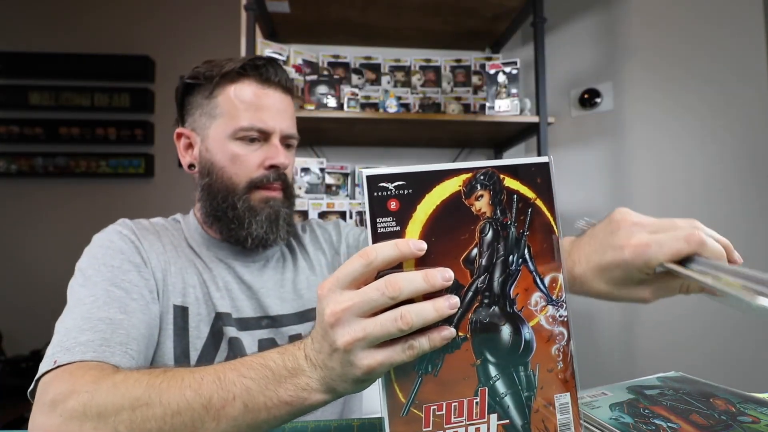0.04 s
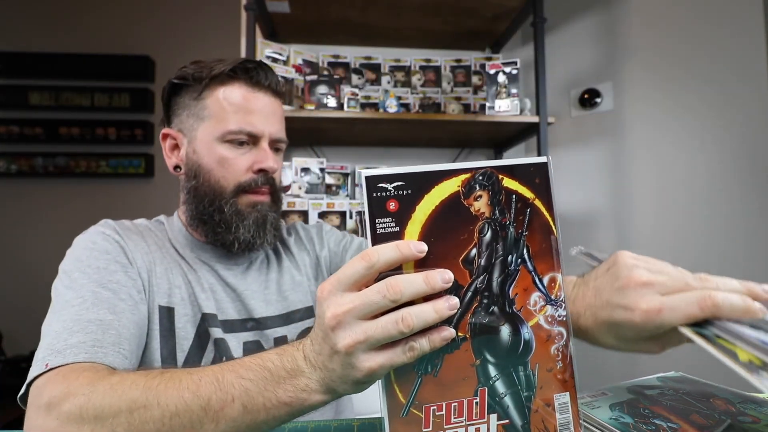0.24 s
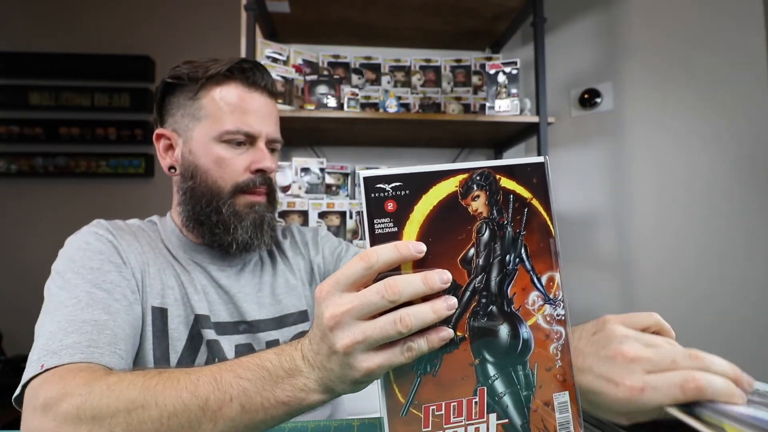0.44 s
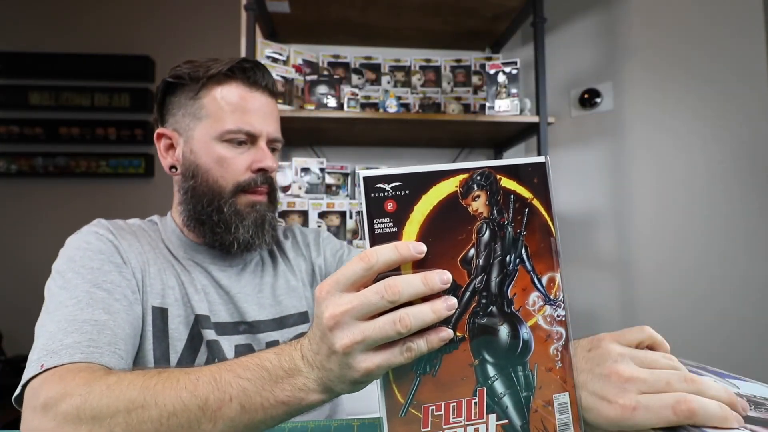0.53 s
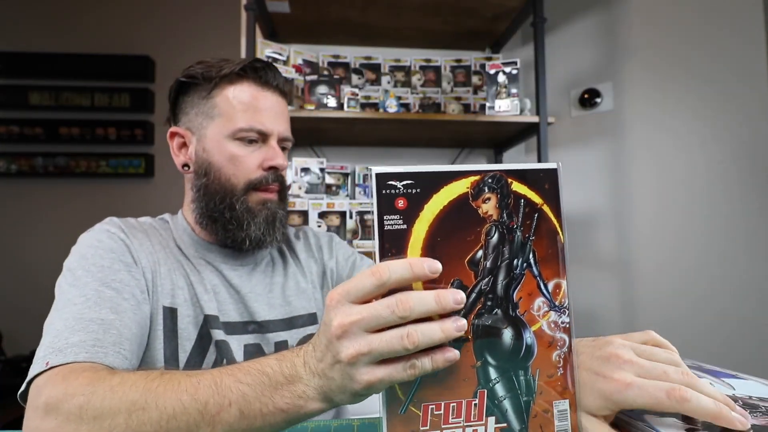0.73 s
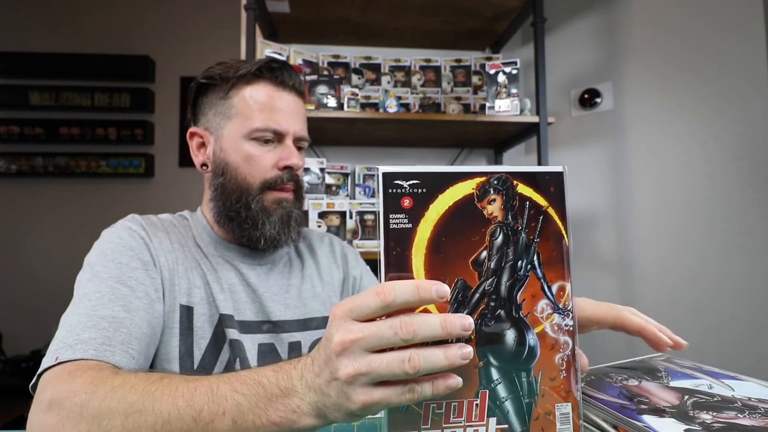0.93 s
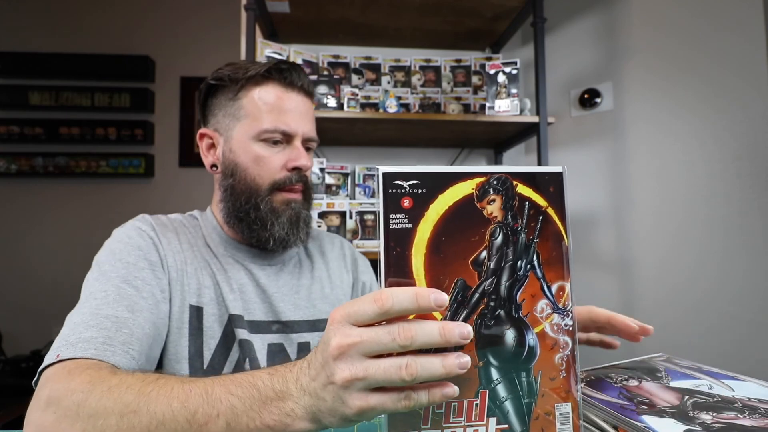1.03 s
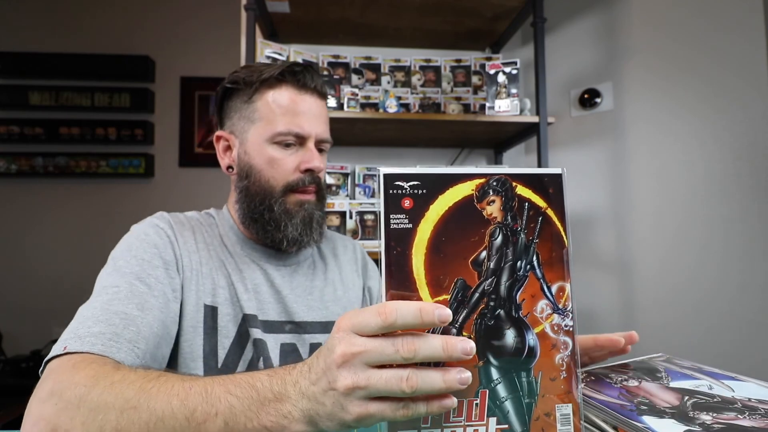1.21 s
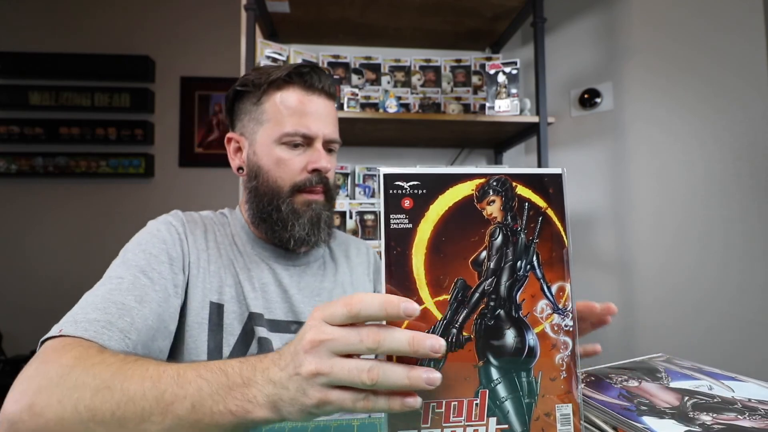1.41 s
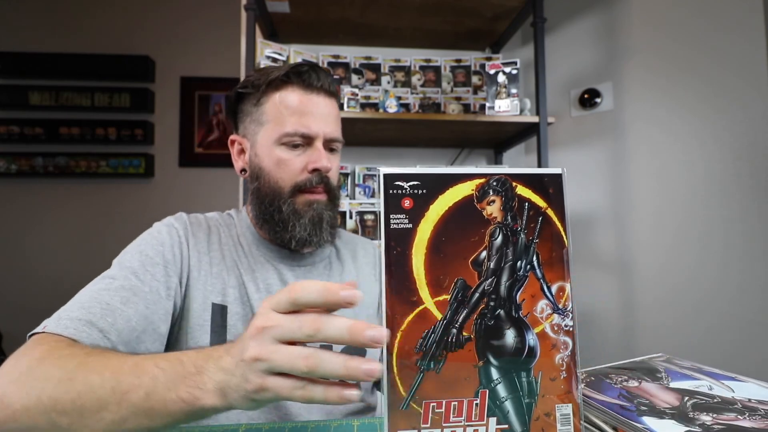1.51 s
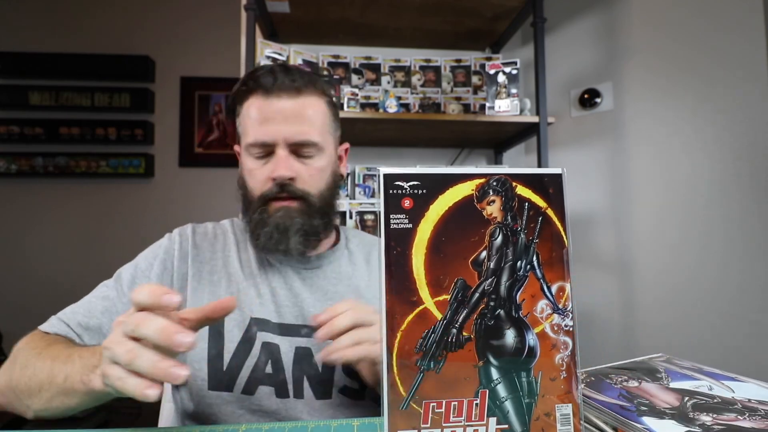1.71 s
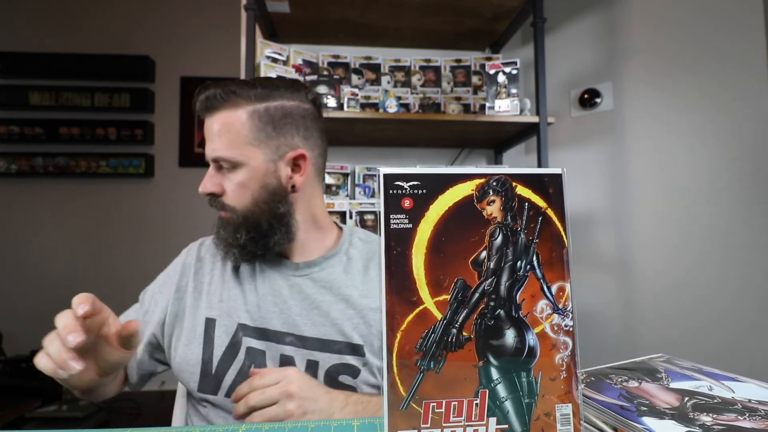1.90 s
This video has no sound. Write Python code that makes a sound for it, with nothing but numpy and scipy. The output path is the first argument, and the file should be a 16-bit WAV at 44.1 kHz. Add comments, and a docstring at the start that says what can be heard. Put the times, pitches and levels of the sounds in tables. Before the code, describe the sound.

Crinkling plastic as a sleeved comic slides onto a stack and drops with a slap.

```python
"""In a small room with mains hum, a comic in a plastic sleeve is swung over a table, slid onto a pile
of others and let drop. The sleeve crinkles by buckling, the backing board flaps, and sliding friction
hisses. The landing slaps and sets the modes of the pile thudding; the table sways the near microphone.
The hand slips off, the arms rustle faintly and a few tiny ticks follow."""
import sys
import numpy as np
from scipy import signal
from scipy.fft import rfft, irfft, next_fast_len
from scipy.io import wavfile

SR = 44100
rng = np.random.default_rng(int(sys.argv[2]) if len(sys.argv) > 2 else 0)


def wav_record(signal):
    """Record a signal, one row per channel, as 16-bit PCM in the file named by sys.argv[1]."""
    frames = np.transpose(np.atleast_2d(signal))
    bounded = np.clip(frames, -1, 1)
    # unit amplitude maps onto the largest positive 16-bit level
    quanta = np.round(bounded * 32767).astype(np.int16)
    wavfile.write(sys.argv[1], SR, quanta)


N = 85995


def amp(db):
    """Amplitude ratio of a level in decibels."""
    return 10 ** (np.asarray(db) / 20)


def along(points, hz):
    """Interpolation of (Hz, value) points on a logarithmic frequency axis."""
    freqs, values = np.transpose(points)
    return np.interp(np.log(hz + 1e-6), np.log(freqs), values)


def envelope(rows):
    """Gain per sample, linear in decibels between (seconds, dB) rows."""
    return amp(np.interp(np.arange(N) / SR, *np.transpose(rows)))


def filtered(x, response):
    """Linear filtering: the spectrum of x is multiplied by a frequency response."""
    size = next_fast_len(N + SR // 2)
    return irfft(rfft(x, size) * response(np.fft.rfftfreq(size, 1 / SR)), size)[..., :N]


def coloured(x, spectrum):
    """Spectral shaping of x by (Hz, dB) rows, normalised to unit rms."""
    shaped = filtered(x, lambda hz: amp(along(spectrum, hz)))
    return shaped / np.sqrt(np.mean(shaped ** 2) + 1e-20)


def noise(spectrum):
    """Gaussian noise of unit rms with the given spectral shape."""
    return coloured(rng.standard_normal(N), spectrum)


def add(track, start_s, sound):
    """Superposition of a sound on the track."""
    part = track[round(start_s * SR):][:len(sound)]
    part += sound[:len(part)]


def snap(db, t60, colour, ring_hz=1, size=4096):
    """Source and filter: an impulse and a dying train of micro-buckles excite a body's response."""
    drive = 0.72 * rng.standard_normal(size) * amp(-60 * np.arange(size) / SR / t60)
    drive[0] += 2  # the first snap
    gain = amp(along(colour, np.fft.rfftfreq(size, 1 / SR) / ring_hz))
    cepstrum = irfft(np.log(gain))
    cepstrum[1:size // 2] *= 2  # folding gives a causal, minimum-phase response
    cepstrum[size // 2 + 1:] = 0
    sound = irfft(rfft(drive) * np.exp(rfft(cepstrum)))
    span = round(0.003 * SR)  # db is the rms level of the whole energy packed into 3 ms
    return amp(db) * np.sqrt(span) * sound / np.linalg.norm(sound)


def background(room_tone_db=-56.5):
    """Mains harmonics and room tone, with structure-borne sway passed from table to microphone."""
    # Each row: frequency in Hz, level in dB.
    harmonics = [(59.6, -57), (119.6, -69.5), (179.6, -60.5)]
    # Each row: time in seconds, level in dB.
    sway_levels = [(0, -56), (.5, -67.5), (.63, -33), (.71, -35), (.755, -31.5), (.85, -30.5), (.98, -33),
                   (1.15, -46.5), (1.35, -47.5), (1.95, -59)]
    # Each row: frequency in Hz, relative spectral density in dB.
    sway_spectrum = [(3, -22), (11, 0.5), (22, -0.5), (35, -5), (55, -18.5), (80, -31), (200, -48),
                     (600, -79)]
    room_tone_spectrum = [(12, -17), (22, 3), (60, -13.5), (91, -13.5), (190, -10), (300, -16),
                          (500, -19.5), (1030, -24), (3440, -29), (5380, -29.5), (16000, -32)]
    t = np.arange(N) / SR
    hum = sum(amp(db) * np.sqrt(2) * np.sin(2 * np.pi * (hz * t + rng.random())) for hz, db in harmonics)
    sway = envelope(sway_levels) * noise(sway_spectrum)
    return hum + sway + amp(room_tone_db) * noise(room_tone_spectrum)


def microphone_hiss(level_db=-64):
    """Self-noise of the microphone, in antiphase between the two channels."""
    # Each row: frequency in Hz, relative spectral density in dB.
    spectrum = [(30, -18), (150, -2), (500, 1.5), (1500, -4.5), (3500, -7), (7000, 1), (16000, 0.5)]
    hiss = amp(level_db) * noise(spectrum)
    return np.array([hiss, -hiss])


def sleeve_slide(slips_per_s=14000, spread_db=3.5):
    """Stick-slip friction: plastic moves over plastic in dense impulses of uneven size."""
    # Each row: time in seconds, level in dB.
    levels = [(0, -53.5), (.07, -64), (.11, -54), (.21, -56.5), (.245, -46.5), (.28, -49), (.325, -52.5),
              (.37, -45), (.405, -40.5), (.435, -36.5), (.48, -35), (.5, -31), (.545, -36), (.58, -44),
              (.685, -47), (.703, -33.5), (.71, -43.5), (.745, -39.5), (.8, -54.5), (.9, -61), (1, -88)]
    # Each row: frequency in Hz, relative spectral density in dB.
    spectrum = [(80, -24), (280, -10), (460, 0), (620, 3.5), (1100, -0.5), (1900, -4.5), (3600, -5),
                (5500, -8.5), (7500, -20), (12000, -24.5), (16000, -30)]
    sizes = amp(spread_db * np.minimum(rng.exponential(size=N), 4))
    slips = (rng.random(N) < slips_per_s / SR) * sizes * rng.standard_normal(N)
    return envelope(levels) * coloured(slips, spectrum)


def board_flaps():
    """Bending vibration: the board and pages give a deep flex and a papery clack at each flap."""
    # Each row: start in seconds, flex level in dB, clack level in dB, clack pitch in Hz, T60 in seconds.
    flaps = [(.005, -51, -48, 1240, 0.0045), (0.0243, -43.5, -53, 1200, 0.0088),
             (.051, -47.5, -46.5, 1200, 0.016), (.088, -43.5, -47.5, 1130, 0.036),
             (0.105, -43, -41, 1140, 0.066), (0.1423, -42.5, -51, 1270, 0.013),
             (0.168, -49, -53, 1110, 0.011), (.181, -49, -47, 1000, .014),
             (0.196, -44.5, -52, 1110, 0.0087), (.233, -34, -37.5, 1220, 0.02),
             (0.3012, -36, -38, 910, 0.027), (.413, -37.5, -27, 910, 0.047), (.436, -39, -44, 850, 0.0054),
             (0.491, -40.5, -33, 1050, 0.011), (.4997, -27, -18.5, 1093, 0.036),
             (0.5123, -44, -26, 1150, 0.021), (.521, -40, -31, 1330, 0.038), (0.9048, -49, -42, 1170, .007),
             (.979, -68, -43.5, 810, 0.011)]
    # Each row: frequency in Hz, relative level in dB.
    flex_spectrum = [(60, -32), (150, -15.5), (220, -2), (300, -8), (400, -1.5), (490, -1.5), (650, -4),
                     (1000, -27), (3000, -20.5), (8000, -56)]
    # Each row: multiple of the clack pitch, relative level in dB.
    clack_colour = [(.08, -39), (.3, -20.5), (.52, -9), (.78, -6.5), (1, 2), (1.15, -2), (1.4, -7.5),
                    (3, -16.5), (6, -24.5), (14, -48)]
    out = np.zeros(N)
    for start, flex_db, clack_db, hz, t60 in flaps:
        add(out, start, snap(flex_db, t60, flex_spectrum) + snap(clack_db, t60, clack_colour, hz))
    return out


def sleeve_crinkles(crack_t60_s=0.007):
    """Snap-through buckling: the plastic film releases elastic energy as a ring and a bright crack."""
    # Each row: start in seconds, ring level in dB, ring pitch in Hz, T60 in seconds, crack level in dB.
    buckles = [(0.1053, -39, 4230, 0.017, -73), (0.235, -33.5, 3570, 0.039, -69),
               (0.3368, -34.5, 4180, 0.027, -37), (0.342, -33, 4830, 0.049, -53),
               (.381, -35, 4330, 0.019, -44.5), (0.4128, -25.5, 3790, 0.071, -36),
               (0.464, -44, 5050, .01, -42.5), (0.4975, -34, 5600, .008, -46), (0.5, -44, 6050, 0.023, -23),
               (.504, -24.5, 4870, 0.0061, -48), (0.5069, -23.5, 5270, 0.031, -39),
               (0.5206, -21, 5070, 0.015, -33.5), (0.5242, -32, 5000, 0.0055, -33.5),
               (0.5286, -29, 4300, 0.017, -35.5), (0.717, -29.5, 3230, .008, -56),
               (.7235, -28, 3690, 0.023, -47), (.9057, -31, 3800, 0.015, -56),
               (0.938, -33, 4600, 0.02, -61), (.947, -37.5, 2230, 0.013, -73),
               (1.088, -47, 3700, 0.011, -72)]
    # Each row: multiple of the ring pitch, relative level in dB.
    film_colour = [(.03, -49), (.15, -20.5), (.45, -15.5), (.66, -9.5), (.86, -7), (1, -2), (1.16, -7),
                   (1.45, -12.5), (1.9, -23.5), (3.5, -44)]
    # Each row: frequency in Hz, relative spectral density in dB.
    crack_spectrum = [(500, -28), (3000, -7), (7000, 0), (11000, -1), (16000, -7)]
    out = np.zeros(N)
    for start, db, hz, t60, crack_db in buckles:
        add(out, start, snap(db, t60, film_colour, hz) + snap(crack_db, crack_t60_s, crack_spectrum))
    return out


def landing(attack_s=0.001):
    """Impact excitation: the comic slaps down, edge first, then flat, and the pile's damped modes thud."""
    # Each row: start in seconds, slap level in dB, slap T60 in seconds, relative thud level in dB.
    impacts = [(.717, -21.5, 0.075, -56), (0.7251, -22, 0.0083, -25.5)]
    # Each row: frequency of a mode of the pile on the table in Hz, relative level in dB, T60 in seconds.
    pile_modes = [(35.9, -2.5, 0.63), (56.4, -0.5, 0.64), (126.4, -5, 0.185), (148, -0.5, 0.18),
                  (207, -17.5, 0.46), (261.4, -3, 0.13), (387.4, -5, 0.11), (480, 1.5, 0.078),
                  (696, 11, 0.045), (834, -6, 0.048)]
    # Each row: frequency in Hz, relative spectral density in dB.
    slap_spectrum = [(60, -10), (150, -1.5), (260, 1), (450, -0.5), (730, -1), (1150, -10), (2200, -7.5),
                     (4000, -18.5), (7000, -21.5), (16000, -69)]
    t = np.arange(SR // 2) / SR
    thud = sum(amp(db - 60 * t / t60) * np.sin(2 * np.pi * hz * t) for hz, db, t60 in pile_modes)
    thud *= 1 - np.exp(-t / attack_s)
    out = np.zeros(N)
    for start, db, t60, thud_db in impacts:
        add(out, start, snap(db, t60, slap_spectrum))
        add(out, start, -amp(thud_db) * thud / 2)
    return out


def hand_brush():
    """Sliding friction: skin leaves the sleeve with a smooth broadband noise."""
    # Each row: time in seconds, level in dB.
    levels = [(.75, -57.5), (.86, -56), (.96, -55.5), (1.03, -51.5), (1.1, -53.5), (1.25, -60), (1.4, -72)]
    # Each row: frequency in Hz, relative spectral density in dB.
    spectrum = [(150, -30), (300, -1), (600, -12.5), (1200, -2.5), (2200, -9.5), (3700, -4.5), (5500, -5.5),
                (8000, -19), (12000, -15), (16000, -17)]
    return envelope(levels) * noise(spectrum)


def arm_rustle():
    """Friction noise: cloth rubs softly as the arms move."""
    # Each row: time in seconds, level in dB.
    levels = [(1.42, -84), (1.52, -63), (1.6, -57), (1.7, -56.5), (1.8, -58.5), (1.95, -55.5)]
    # Each row: frequency in Hz, relative spectral density in dB.
    spectrum = [(150, -4), (330, 1.5), (750, 2.5), (1200, 1), (2200, -7.5), (3700, -3), (5500, -8.5),
                (8000, -17), (16000, -14)]
    return envelope(levels) * noise(spectrum)


def ticks():
    """Heavily damped transients: tiny ticks sound after the comic has settled."""
    # Each row: start in seconds, level in dB, ring pitch in Hz, T60 in seconds.
    events = [(1.7298, -44.5, 3900, 0.0066), (1.733, -40.5, 3580, 0.0045), (1.7613, -46, 7100, 0.0068),
              (1.7934, -34, 5750, 0.014), (1.803, -44.5, 4170, 0.0065), (1.9032, -36.5, 1640, 0.0044)]
    # Each row: multiple of the ring pitch, relative level in dB.
    colour = [(.1, -50), (.62, -28), (.77, -1), (.9, -0.5), (1.05, 0.5), (1.4, -5.5), (1.9, -17.5),
              (2.6, -21), (5, -43)]
    out = np.zeros(N)
    for start, db, hz, t60 in events:
        add(out, start, snap(db, t60, colour, hz))
    return out


def room_response(tail_db=-10, walls_db=-16, delay_s=0.004, walls_s=0.022, reflections=10):
    """Impulse response: early reflections and a diffuse tail that decays exponentially in each band."""
    # Each row: frequency in Hz, reverberation time T60 in seconds.
    decay_times = [(100, 0.49), (500, 0.3), (1500, 0.67), (4500, 0.58), (8000, 0.47), (16000, 0.083)]
    # Each row: frequency in Hz, relative level of the tail in dB.
    colour = [(50, -2), (150, 8), (300, 8), (600, -8.5), (1200, -1), (5000, -3), (9000, 0.5), (16000, 3.5)]
    hz, t, bands = signal.stft(rng.standard_normal(SR * 3 // 4), SR, nperseg=256)
    decay = amp(along(colour, hz)[:, None] - 60 * t / along(decay_times, hz)[:, None])
    tail = signal.istft(bands * decay, SR, nperseg=256)[1]
    response = amp(tail_db) * tail / np.linalg.norm(tail)
    for when, sign in rng.random((reflections, 2)):
        response[int(when * walls_s * SR)] += np.sign(sign - 0.5) * amp(walls_db) / np.sqrt(reflections)
    return np.pad(response, (round(delay_s * SR), 0))


def reverberation(x, positions=16):
    """Time-varying convolution: as the comic moves, its sound fades from one room response to the next."""
    place = np.linspace(0, positions - 1, N)
    fades = (np.maximum(1 - abs(place - k), 0) for k in range(positions))
    return sum(signal.fftconvolve(x * fade, room_response())[:N] for fade in fades)


def scene(tick_send_db=-1, landing_send_db=-2):
    """Direct and reverberant sound add at one microphone; only its hiss differs between the channels."""
    handling = sleeve_crinkles() + board_flaps() + sleeve_slide() + hand_brush() + arm_rustle()
    drop, ticking = landing(), ticks()
    reverb = reverberation(handling + amp(landing_send_db) * drop + amp(tick_send_db) * ticking)
    return handling + drop + ticking + reverb + microphone_hiss() + background()


def record(dry, cutoff_hz=16000):
    """Band limiting by a steep low-pass filter."""
    return filtered(dry, lambda hz: 1 / (1 + (hz / cutoff_hz) ** 160))


dry = scene()
out = record(dry)
wav_record(out)
```